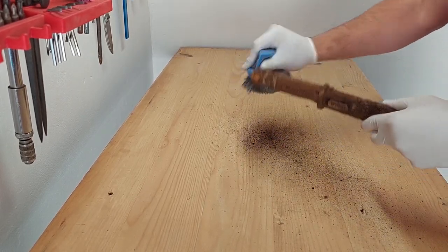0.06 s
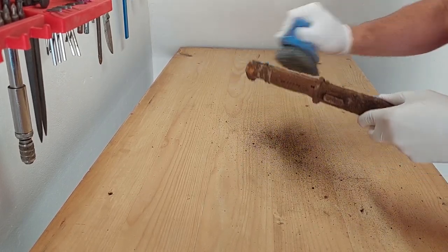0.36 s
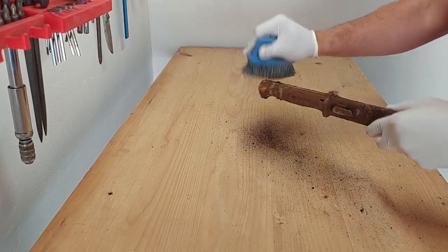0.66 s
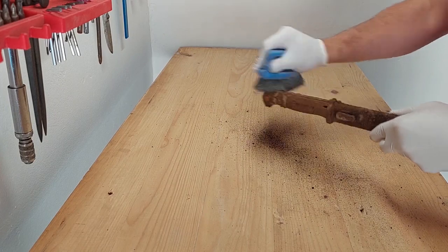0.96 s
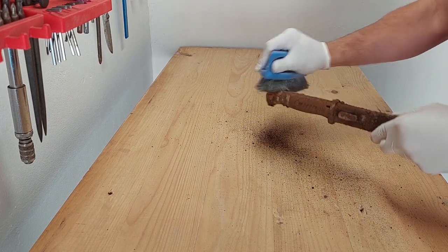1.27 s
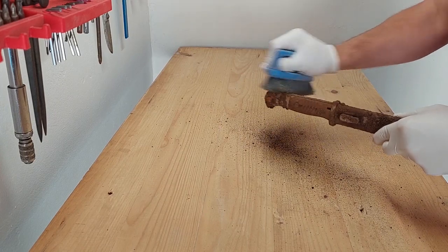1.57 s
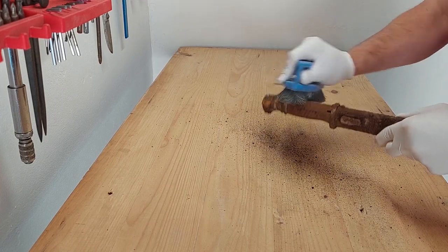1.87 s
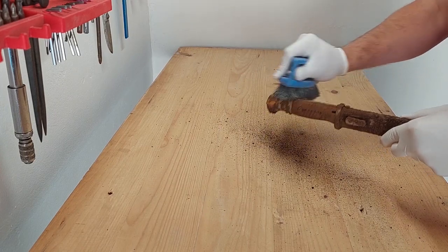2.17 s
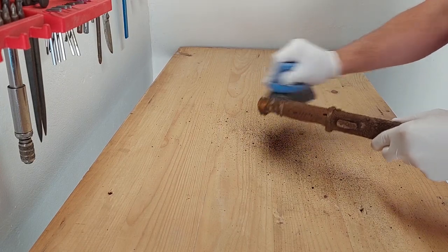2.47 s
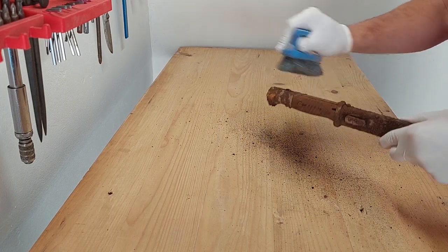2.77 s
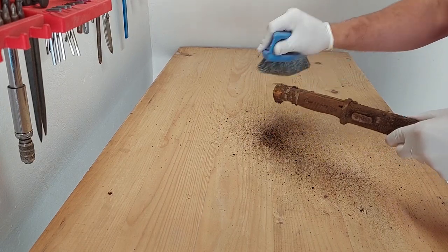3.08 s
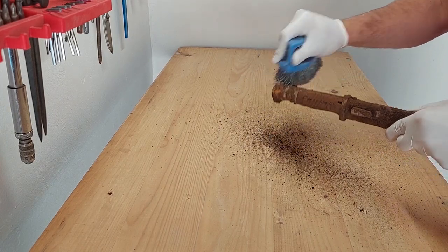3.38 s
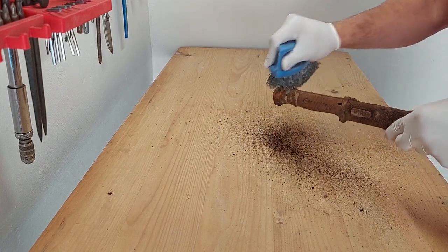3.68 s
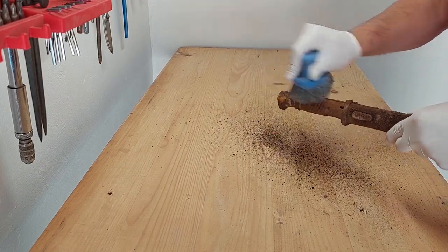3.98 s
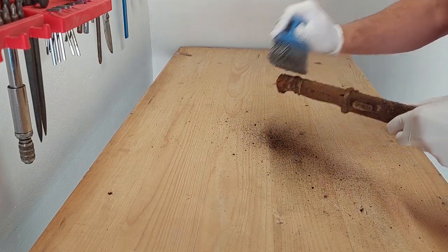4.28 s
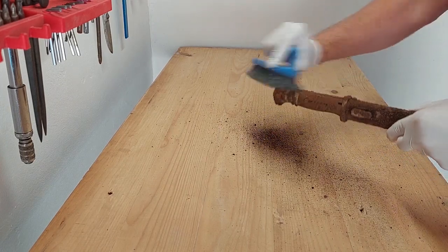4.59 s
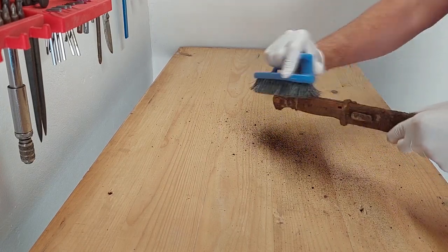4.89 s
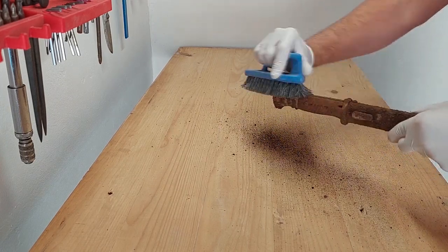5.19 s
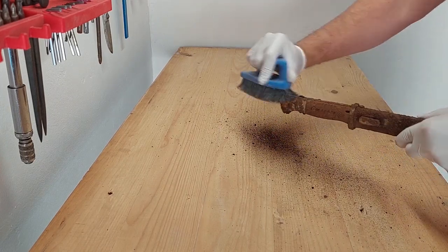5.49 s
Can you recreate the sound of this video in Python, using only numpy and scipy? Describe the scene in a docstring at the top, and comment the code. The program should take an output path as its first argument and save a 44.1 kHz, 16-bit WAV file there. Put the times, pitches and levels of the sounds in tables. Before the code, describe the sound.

A wire brush scrubs rusty hollow steel in quick, scratchy strokes, with a few knocks on a wooden workbench.

```python
"""A hand wire brush scrubs a rusty steel scabbard in quick strokes over a wooden bench in a small garage.
Thousands of wire tips stick and slip on the rust: their impulses merge into hiss and excite the
resonances of the hollow sheath. The brush lands with short splashes, a glove rustles, and two double
knocks set the bench ringing. Outside, a distant engine slows down and picks up again."""
import sys
import numpy as np
from scipy import signal
from scipy.fft import rfft, irfft
from scipy.io import wavfile

SR = 44100
rng = np.random.default_rng(int(sys.argv[2]) if len(sys.argv) > 2 else 0)


def unload_audio(sound):
    """Save the sound as a 16-bit wav file, at the path given as the first command line argument."""
    columns = np.transpose(np.atleast_2d(sound))
    # keep every value between -1 and 1, then stretch to whole-number steps
    steps = np.round(np.clip(columns, -1, 1) * 32767)
    wavfile.write(sys.argv[1], SR, steps.astype(np.int16))


N = 243873
TIME = np.arange(N) / SR
BINS_HZ = np.maximum(np.arange(N // 2 + 1) * SR / N, 1)
CUTOFF_HZ = 15950

# brush strokes: (time of fastest motion [s], duration [s], level [dB])
BRUSH_STROKES = [(0.069, 0.097, -39), (0.678, 0.089, -37.5), (1.01, 0.1, -36.5), (1.138, 0.044, -56),
                 (1.314, 0.091, -38), (1.431, 0.089, -42), (1.545, 0.072, -36.5), (1.665, 0.093, -42),
                 (1.771, 0.071, -40), (1.897, 0.079, -42.5), (2.006, 0.084, -39.5), (2.128, 0.123, -40.5),
                 (2.324, 0.085, -45.5), (2.459, 0.093, -43), (2.575, 0.068, -40.5), (3.017, 0.082, -45),
                 (3.51, 0.11, -56), (3.62, 0.084, -50), (3.715, 0.069, -50.5), (3.828, 0.086, -46.5),
                 (3.941, 0.075, -44), (4.062, 0.089, -45.5), (4.185, 0.085, -38.5), (4.338, 0.047, -48),
                 (4.659, 0.1, -38), (4.823, 0.084, -38), (4.947, 0.094, -37), (5.088, 0.092, -37.5),
                 (5.234, 0.11, -36), (5.382, 0.089, -37), (5.517, 0.082, -34)]
# wires landing on the steel: (time [s], level [dB], extra sheath ring [dB], attack [s])
BRUSH_LANDINGS = [(0.126, -41.5, 16, .001), (0.213, -58.5, 17, 0.00089), (0.575, -45, 8.5, 0.0056),
                  (0.773, -43, 6.5, .0005), (0.897, -45.5, 16, 0.0013), (1.209, -43, 3.5, .011),
                  (2.940, -51.5, 4.5, 0.0023), (4.225, -38, 8, 0.0011), (4.3, -43.5, 14.5, 0.004),
                  (4.533, -43.5, 14, 0.0027)]
# hiss of the wire tips: (frequency [Hz], relative spectral density [dB])
WIRE_SPECTRUM = [(120, -11), (280, -16), (460, -15.5), (900, -7.5), (1500, -5.5), (2400, 0), (3200, -2.5),
                 (5000, 1.5), (6500, -0.5), (8000, -1), (8800, -7), (10000, -6), (12000, 1), (15700, 1)]
# finest sizzle of the strokes: (time [s], gain [dB])
SIZZLE_GAIN = [(0.0, 0), (1.0, -0.1), (1.9, -1.5), (2.32, -2), (2.47, 0.4), (3.0, -0.7), (3.7, .3),
               (4.2, -2), (4.66, .4), (5.53, 0.5)]
# hollow sheath, damped by the hand: (frequency [Hz], bandwidth [Hz], gain [dB])
SHEATH_MODES = [(273, 61, -10), (845, 560, -13.5), (1620, 72, -0.5), (1835, 67, -0.5), (1964, 70, 2),
                (2117, 135, -1), (2396, 236, -1), (2570, 120, 4), (2730, 310, -3), (3880, 204, -6),
                (4270, 82, -17.5)]
# knocks on the bench: (time [s], level [dB], contact cut-off [Hz])
BENCH_KNOCKS = [(0.1284, -22.5, 2290), (0.2182, -46.5, 596), (4.2266, -39, 2200), (4.2985, -27.5, 1520)]
# modes of the bench top: (frequency [Hz], gain [dB], 60 dB decay time [s])
BENCH_MODES = [(179.3, -13.5, 0.12), (239, -17, 0.42), (366, -54, 0.058), (580, -34.5, .11),
               (758, -27, 0.086), (852, -24.5, 0.09), (1027, -2.5, 0.045), (1110, -35, 0.12),
               (1270, -17, 0.15), (1312, -16, 0.17)]
# dry crack of a knock: (frequency [Hz], gain [dB], 60 dB decay time [s])
CRACK_MODES = [(700, -2, .005), (1030, 3, .005), (1650, -6, .008), (1950, -1, .011), (3700, -9, .004)]
# delayed copies of a knock, first small rattling repeats, then reflections from bench and walls: (delay [s],
# gain [dB])
DELAYED_COPIES = [(.0026, -7), (.0055, -7.5), (0.0165, -31), (0.0198, -10)]
# rustles as the brush is turned in the hand: (time [s], half duration [s], level [dB])
GLOVE_RUSTLES = [(0.358, 0.061, -75), (2.692, 0.05, -70.5), (2.845, 0.061, -77), (3.152, 0.055, -65),
                 (3.41, 0.046, -73.5), (4.462, 0.092, -63)]
# glove cloth: (frequency [Hz], relative spectral density [dB])
CLOTH_SPECTRUM = [(200, 1), (600, -19), (2000, 2.5), (3300, -3.5), (5500, 4), (7800, 0), (9000, -13),
                  (15500, -10)]
# speed of the engine: (time [s], firing rate [Hz])
FIRING_RATE = [(0.2, 60.59), (1.5, 49.15), (2.1, 42.3), (2.55, 36.39), (3.8, 32.5), (4.2, 36.5),
               (4.62, 45.02), (5.1, 44.2), (5.53, 44.97)]
# engine load, weak in overtones when coasting: (time [s], relative level [dB], step per harmonic [dB])
ENGINE_LOAD = [(0.0, -74, -1), (0.2, -55.5, -2), (0.55, -69, -5), (1.15, -79, -3), (1.45, -62.5, -4.5),
               (1.85, -66.5, -6), (3.8, -72.5, -1), (4.4, -56, 1), (5.53, -56.5, 3.5)]
# transmission of the engine's harmonics through the walls: (frequency [Hz], gain [dB])
WALL_TRANSMISSION = [(32, -9), (44, -13.5), (50, -2), (60, -0.5), (88, -0.5), (110, -1.5), (122, -3),
                     (133, 0.5), (150, -14.5), (185, -22.5)]
# still air of the garage: (frequency [Hz], relative spectral density [dB])
AIR_SPECTRUM = [(20, -25.5), (40, -7), (70, -4), (130, -4.5), (170, -11.5), (300, -18), (600, -23.5),
                (1500, -27.5), (4000, -34.5), (8000, -34), (15500, -43.5)]
# reverberation of the garage: (frequency [Hz], 60 dB decay time [s])
REVERB_TIMES = [(100, .42), (300, .33), (1000, .26), (2000, .23), (5000, .26), (14000, .2)]
# likeness of left and right in the room: (frequency [Hz], correlation [0 to 1])
COHERENCE = [(50, 1), (130, 1), (300, 0.55), (640, 0.59), (1400, 0.092), (3100, 0.29), (6800, 0.031),
             (15000, 0.03)]
# balance of the channels: (frequency [Hz], left minus right [dB])
CHANNEL_BALANCE = [(60, -9.5), (120, -7), (330, -3.5), (600, -5), (2400, -0.2), (4400, -1), (8100, 5.5),
                   (12000, 1.5), (15000, 9)]


def brush(sizzle_db, sheath_db, split_hz):
    """Stick-slip friction: wire tips radiate hiss directly and drive the sheath into vibration."""
    hiss_envelope, ring_envelope, sizzle_envelope = brush_envelopes()
    tips = flicks(per_s=28000, size_db=-0.5, clump_db=1.0)
    wires = rms_one(shaped(tips, from_db(at_hz(WIRE_SPECTRUM, BINS_HZ)) * (BINS_HZ < CUTOFF_HZ)))
    sizzle = shaped(wires, 1 - 1 / (1 + (BINS_HZ / split_hz) ** 8))
    direct = hiss_envelope * (wires - sizzle) + from_db(sizzle_db) * sizzle_envelope * sizzle
    return direct + from_db(sheath_db) * ring_envelope * sheath(shift_db=2.5)


def brush_envelopes(ordinary_db=-38.5, lengthwise_from_s=4.5, splash_t60=0.14):
    """Incoherent sources add in power: strokes and landings sum to envelopes of hiss, ring and sizzle."""
    power = np.zeros((3, N))
    for s, length, level_db in BRUSH_STROKES:
        sliding = stroke_swell(s, length)
        # the wires catch while the stroke is still slow, so the ring leads the hiss and lasts longer
        catching = stroke_swell(s - 0.0055, length + 0.01)
        # the sheath rings more under pressure, and once the brush lies lengthwise on the hollow part
        ring_db = 0.72 * (level_db - ordinary_db) + 4.0 * (s > lengthwise_from_s)
        sizzle_db = np.interp(s, *np.transpose(SIZZLE_GAIN))
        gains = from_db(level_db + np.array([[0], [ring_db], [sizzle_db]]))
        power += (gains * [sliding, catching, sliding]) ** 2
    for s, level_db, ring_db, attack in BRUSH_LANDINGS:
        age = np.maximum(TIME - s, 0)
        splash = (1 - np.exp(-age / attack)) * from_db(level_db - 60 * age / splash_t60)
        power += np.outer(from_db([1.0, ring_db, -5.5]), splash) ** 2  # duller than sliding
    return np.sqrt(power)


def stroke_swell(s, length, rise_share=0.55, roundness=2.04):
    """Friction noise follows sliding speed: a swell of height 1 as the hand speeds up and slows."""
    width = length * np.where(TIME < s, rise_share, 1 - rise_share)
    return np.exp(-np.minimum(np.abs((TIME - s) / width) ** roundness, 20))


def flicks(per_s, size_db, clump_db):
    """Shot noise: tips snap free at random, in clumps as whole tufts catch."""
    released = rng.random((2, N)) < per_s / SR
    sizes = from_db(size_db * np.minimum(rng.exponential(1, (2, N)), 4)) * rng.standard_normal((2, N))
    clumping = from_db(clump_db * drift(70))
    return rms_one(spread(released * sizes * clumping))


def sheath(shift_db):
    """Forced resonance: catching wires drive the modes; the moving contact favours one, then another."""
    catches = flicks(per_s=4200, size_db=-1.5, clump_db=3.0)
    modes = (from_db(db + shift_db * drift(6)) * resonance(catches, hz, width) * (-1) ** k
             for k, (hz, width, db) in enumerate(SHEATH_MODES))
    return rms_one(sum(modes))


def knocks(crack_db, ring_db):
    """Impact excitation: a pulse, softened by the contact, starts a dry crack and the bench's modes."""
    force = np.zeros(N)
    for s, level_db, contact_hz in BENCH_KNOCKS:
        impulse = from_db(level_db) * (np.arange(N) == round(s * SR))
        force += butter(impulse, contact_hz, "low", order=3)
    crack = sum(from_db(db) * ring(force, hz, t60) for hz, db, t60 in CRACK_MODES)
    reach = rng.uniform(.5, 1.5, (len(BENCH_MODES), 2, 1))  # each mode's strength on each side
    wood = sum(from_db(db) * reach[k] * ring(force, hz, t60) * (-1) ** k
               for k, (hz, db, t60) in enumerate(BENCH_MODES))
    return from_db(ring_db) * wood - from_db(crack_db) * butter(crack, 400, "high")


def glove():
    """Fibre friction: cloth slips over the handle in soft swells."""
    swells = sum(from_db(db) * np.exp(-((TIME - s) / half) ** 2) for s, half, db in GLOVE_RUSTLES)
    fibres = flicks(per_s=6000, size_db=0.0, clump_db=1.0)
    return swells * rms_one(shaped(fibres, from_db(at_hz(CLOTH_SPECTRUM, BINS_HZ))))


def faint_whistle(s, half_s, hz, fall_hz_per_s, width_hz, level_db):
    """Narrow-band noise: a faint, thin, unsteady high whistle that falls slightly."""
    age = TIME - s
    phase = 2 * np.pi * (hz * age - fall_hz_per_s * age ** 2 / 2)
    whistle = drift(width_hz) * np.sin(phase) + drift(width_hz) * np.cos(phase)
    return from_db(level_db) * np.exp(-(age / half_s) ** 2) * whistle


def engine(gain_db, waver_db, rumble_db, rumble_hz):
    """Periodic firing makes a harmonic series; the walls pass its lowest three tones and a rumble."""
    firing_hz = np.interp(TIME, *np.transpose(FIRING_RATE))
    times, *columns = np.transpose(ENGINE_LOAD)
    level_db, step_db = [np.interp(TIME, times, column) for column in columns]
    phase = 2 * np.pi * np.cumsum(firing_hz * (1 + 0.011 * drift(11))) / SR
    hum = 0
    for k in (1, 2, 3):
        harmonic_db = at_hz(WALL_TRANSMISSION, k * firing_hz) + step_db * (k - 1.5)
        hum += from_db(harmonic_db + waver_db * drift(11)) * np.sin(k * phase)
    rumble = rms_one(butter(butter(diffuse_noise(), 50, "high"), rumble_hz, "low"))
    return from_db(gain_db + level_db) * (hum + from_db(rumble_db + step_db) * rumble)


def still_air(level_db):
    """Ambient noise: a steady diffuse field, strongest in the bass."""
    return from_db(level_db) * rms_one(shaped(diffuse_noise(), from_db(at_hz(AIR_SPECTRUM, BINS_HZ))))


def rattle_and_echoes(direct):
    """Repeated impact and reflection: the knock rattles briefly and near surfaces return delayed copies, at
    slightly different times per side."""
    lags = rng.normal(0, 0.00039, (len(DELAYED_COPIES), 2))
    echoes = np.zeros((2, N))
    for (delay, db), lag in zip(DELAYED_COPIES, lags):
        for side in (0, 1):
            echoes[side] += from_db(db) * np.interp(TIME - delay - lag[side], TIME, direct[side])
    return direct + echoes


def garage(x, wet_db, build_s):
    """Reverberation: a diffuse tail builds up quickly and decays exponentially, sooner in the treble."""
    age = TIME[:SR // 2]
    spectrum = rfft(diffuse_noise()[:, :len(age)])
    hz = np.fft.rfftfreq(len(age), 1 / SR)
    edges = np.geomspace(60, 20000, 11)
    tail = 0
    for low, high in zip(edges, edges[1:]):
        band = irfft(spectrum * ((hz >= low) & (hz < high)), len(age))
        tail += band * from_db(-60 * age / at_hz(REVERB_TIMES, np.sqrt(low * high)))
    tail *= 1 - np.exp(-age / build_s)
    tail /= np.sqrt(np.sum(tail ** 2) / 2)
    return x + from_db(wet_db) * signal.fftconvolve(x, tail, axes=1)[:, :N]


def diffuse_noise():
    """Diffuse field: white noise, partly correlated between left and right."""
    return spread(rng.standard_normal((2, N)))


def spread(pair):
    """Partial coherence: sum and difference of two signals, alike in the bass, unrelated in the treble."""
    alike = np.clip(at_hz(COHERENCE, BINS_HZ), 0, 1)
    return shaped(pair[0], np.sqrt(1 + alike)) + shaped(pair[1], np.sqrt(1 - alike)) * [[1], [-1]]


def ring(x, hz, t60):
    """Damped oscillator: a unit impulse starts a decaying sine of height 1."""
    radius, angle = from_db(-60 / (t60 * SR)), 2 * np.pi * hz / SR
    return signal.lfilter([0, np.sin(angle)], [1, -2 * radius * np.cos(angle), radius ** 2], x + 1e-18)


def resonance(x, hz, width_hz):
    """Driven resonator: a band-pass with a peak gain of 1."""
    radius, angle = np.exp(-np.pi * width_hz / SR), 2 * np.pi * hz / SR
    gain = (1 - radius ** 2) / 2
    return signal.lfilter([gain, 0, -gain], [1, -2 * radius * np.cos(angle), radius ** 2], x)


def drift(rate_hz):
    """Random modulation: low-passed noise of unit rms."""
    return rms_one(shaped(rng.standard_normal(N), 1 / (1 + (BINS_HZ / rate_hz) ** 2)))


def butter(x, hz, kind, order=2):
    """Causal filtering with a maximally flat passband."""
    return signal.sosfilt(signal.butter(order, hz, kind, fs=SR, output="sos"), x + 1e-18)


def shaped(x, gain):
    """Spectral weighting: one gain per frequency."""
    return irfft(rfft(x) * gain, N)


def at_hz(points, hz):
    """Interpolation of a table on a log-frequency axis."""
    frequencies, values = np.transpose(points)
    return np.interp(np.log(hz), np.log(frequencies), values)


def rms_one(x):
    """Normalisation to unit rms."""
    return x / np.sqrt(np.mean(x ** 2) + 1e-20)


def from_db(db):
    """Amplitude ratio from decibels."""
    return 10 ** (np.asarray(db) / 20)


def scene():
    """Superposition: brush, knocks, glove and a faint whistle, over the engine and still air."""
    scrubbing = garage(brush(sizzle_db=-0.5, sheath_db=-14.0, split_hz=9000), wet_db=-8.0, build_s=0.0038)
    blows = garage(rattle_and_echoes(knocks(crack_db=1.5, ring_db=-9.5)), wet_db=-3.0, build_s=0.008)
    air = still_air(level_db=-70.5)
    rustle = glove()
    whistle = faint_whistle(s=3.275, half_s=.024, hz=7720, fall_hz_per_s=4000, width_hz=70, level_db=-78)
    drone = engine(gain_db=-1.5, waver_db=2.5, rumble_db=-8.5, rumble_hz=270)
    return scrubbing + blows + rustle + whistle + drone + air


def record(dry):
    """Level difference and band limiting: more treble on the left, more bass on the right, the top cut."""
    balanced = shaped(dry, from_db(at_hz(CHANNEL_BALANCE, BINS_HZ) / 2 * np.array([[1], [-1]])))
    return signal.sosfilt(signal.ellip(12, .1, 80, CUTOFF_HZ, fs=SR, output="sos"), balanced)


dry = scene()
out = record(dry)
unload_audio(out)
```